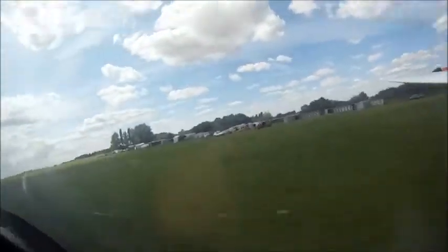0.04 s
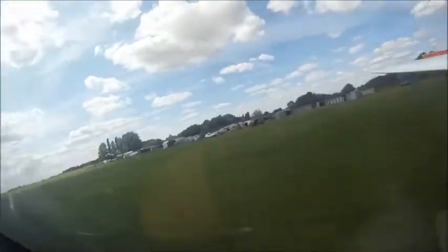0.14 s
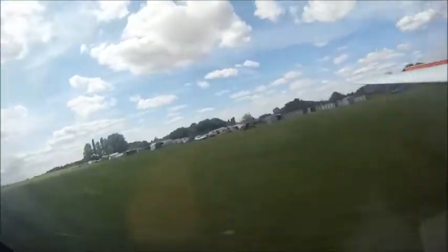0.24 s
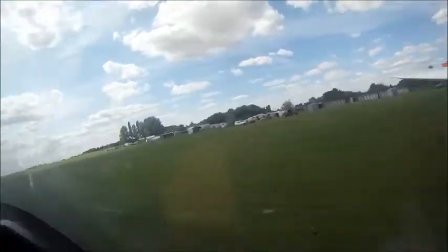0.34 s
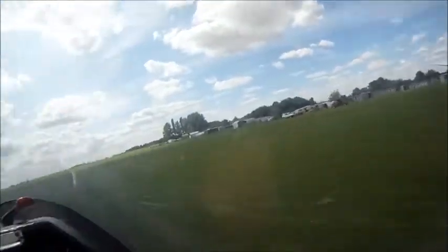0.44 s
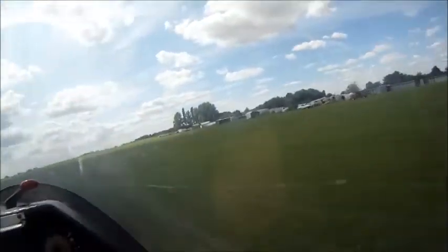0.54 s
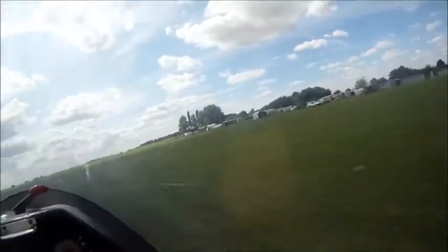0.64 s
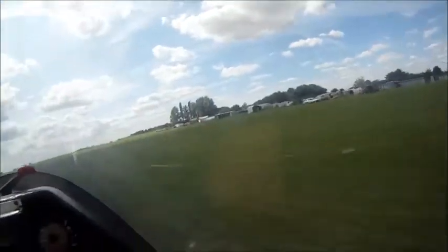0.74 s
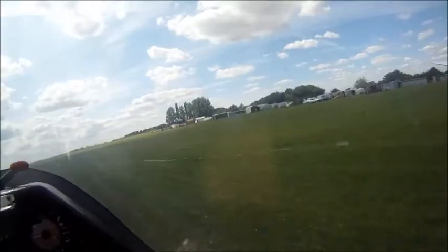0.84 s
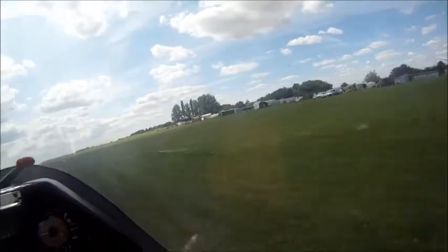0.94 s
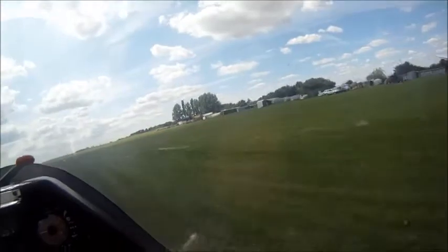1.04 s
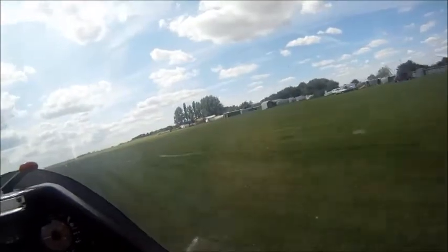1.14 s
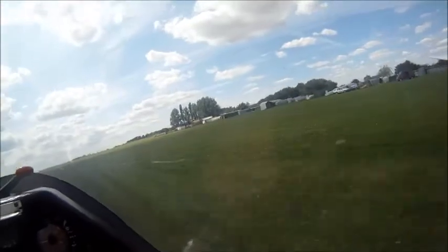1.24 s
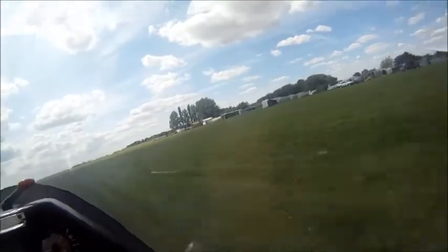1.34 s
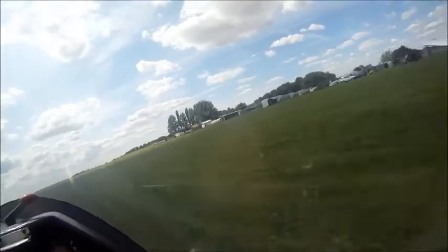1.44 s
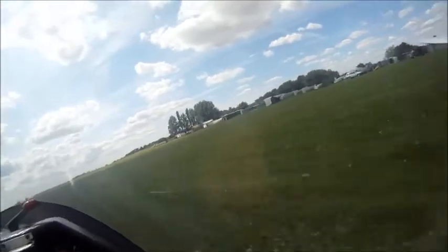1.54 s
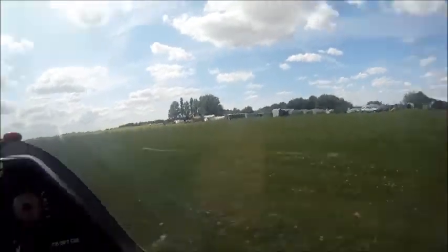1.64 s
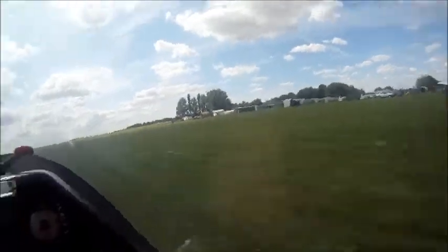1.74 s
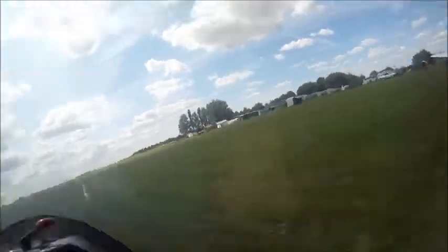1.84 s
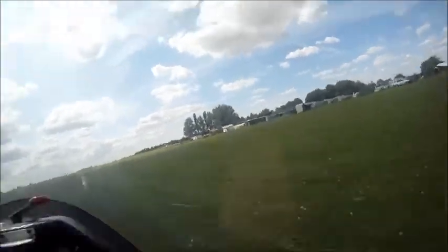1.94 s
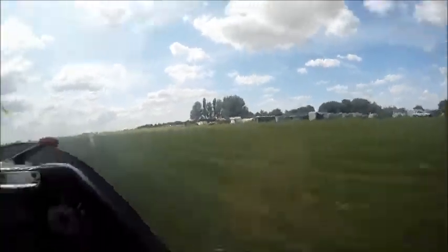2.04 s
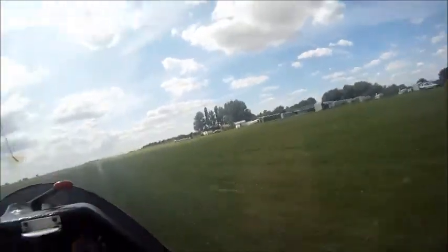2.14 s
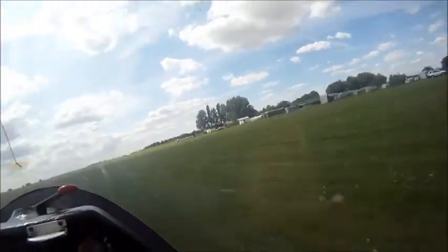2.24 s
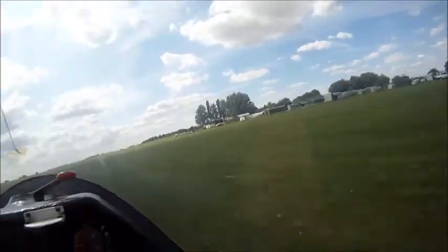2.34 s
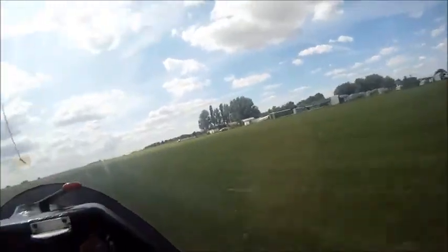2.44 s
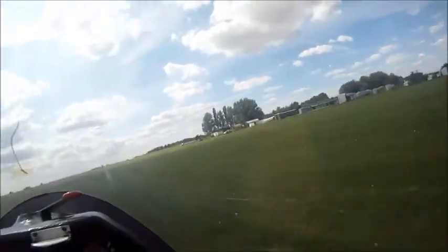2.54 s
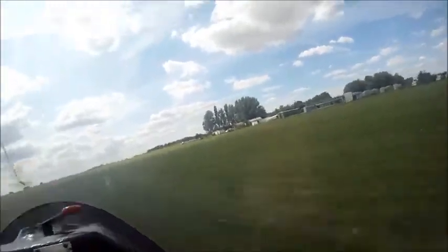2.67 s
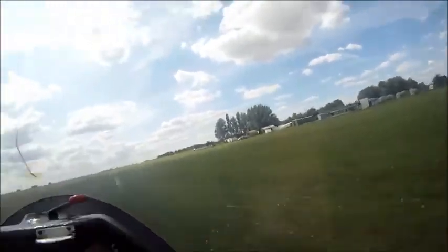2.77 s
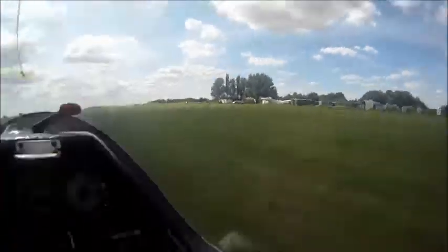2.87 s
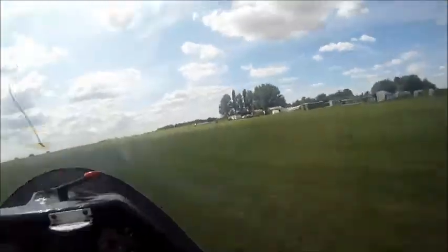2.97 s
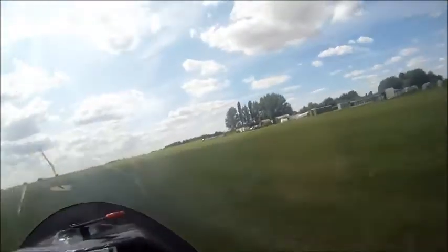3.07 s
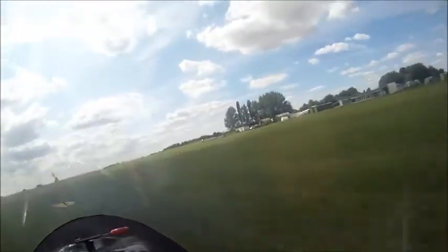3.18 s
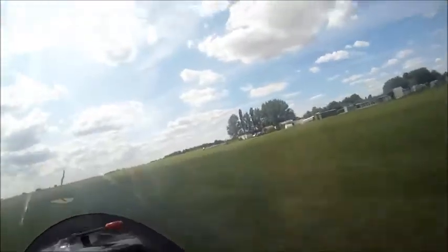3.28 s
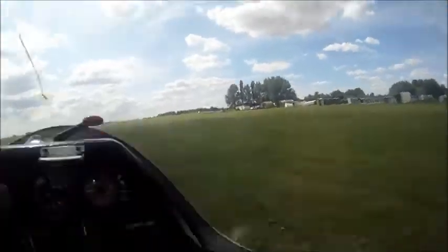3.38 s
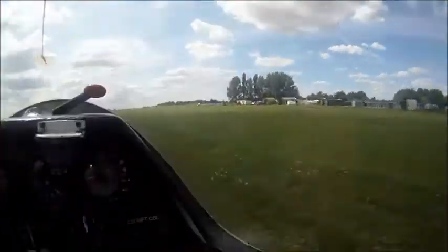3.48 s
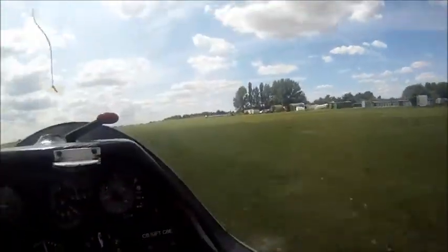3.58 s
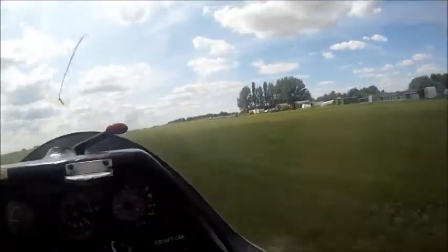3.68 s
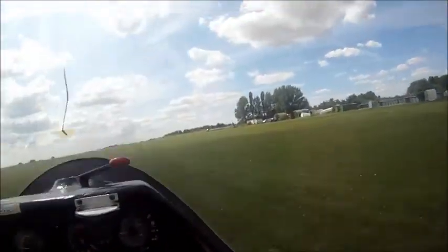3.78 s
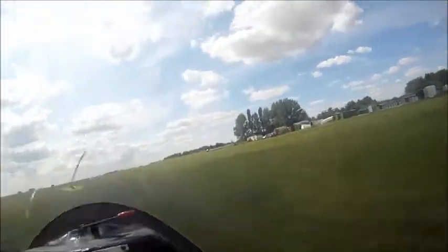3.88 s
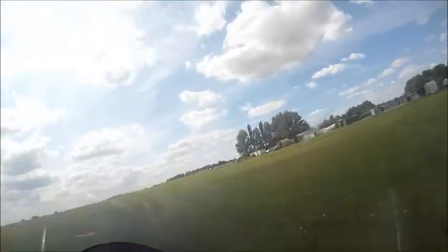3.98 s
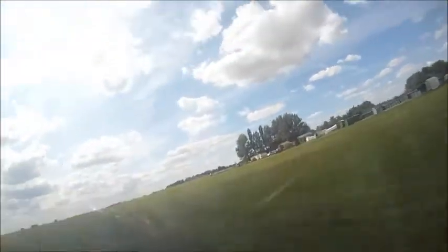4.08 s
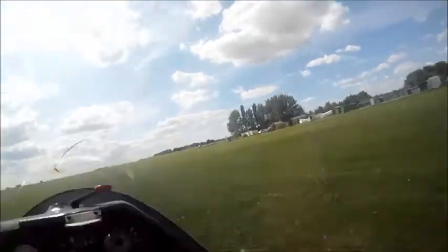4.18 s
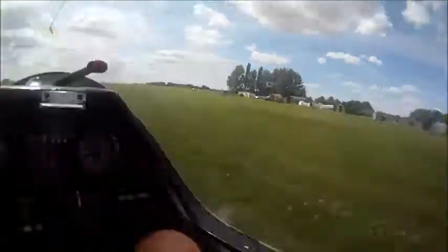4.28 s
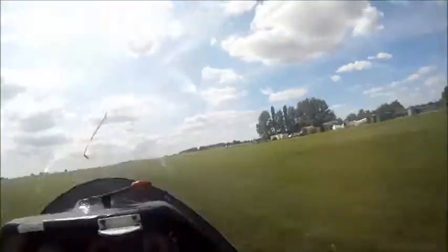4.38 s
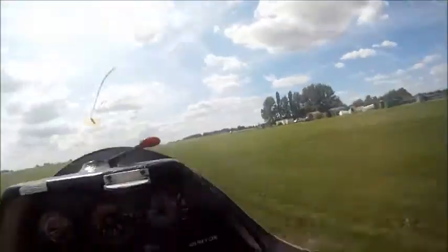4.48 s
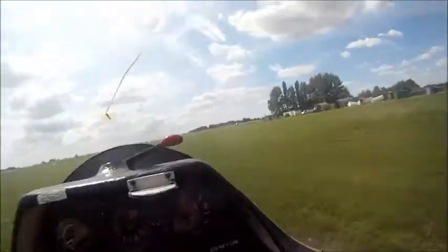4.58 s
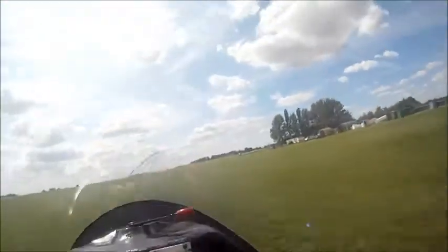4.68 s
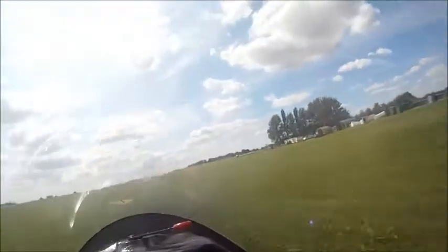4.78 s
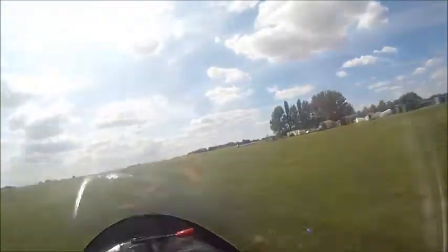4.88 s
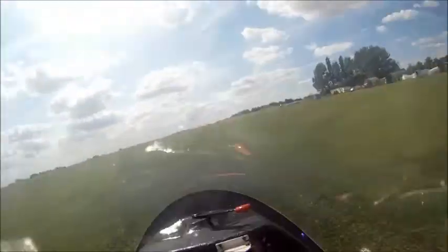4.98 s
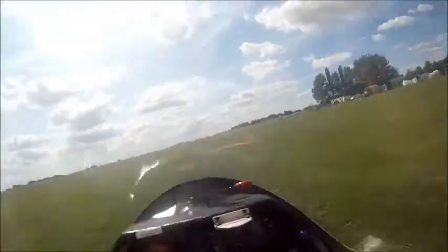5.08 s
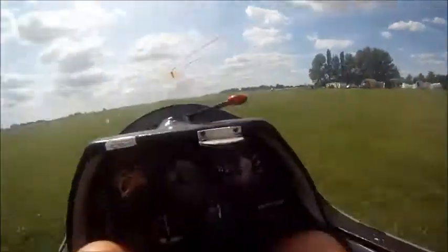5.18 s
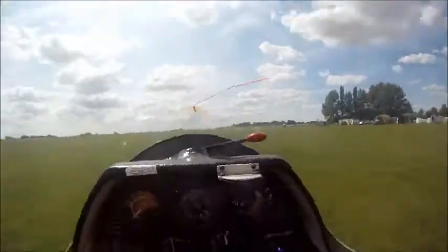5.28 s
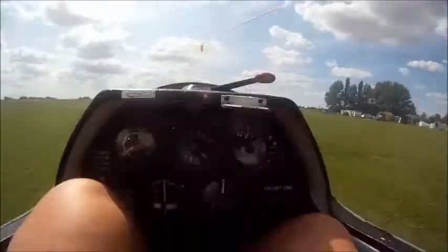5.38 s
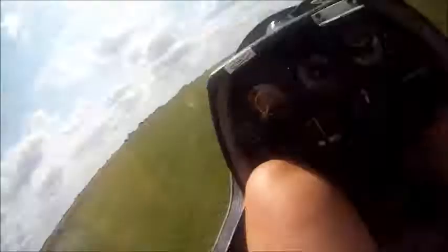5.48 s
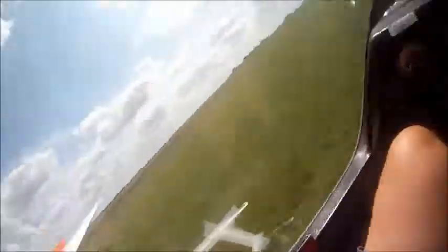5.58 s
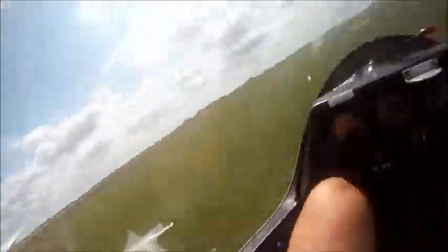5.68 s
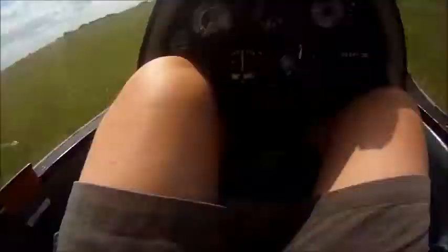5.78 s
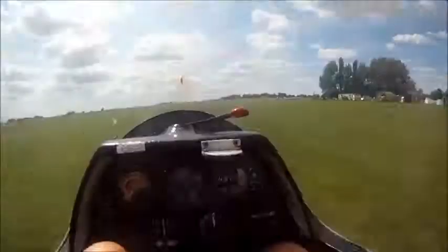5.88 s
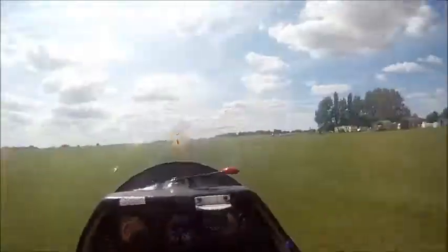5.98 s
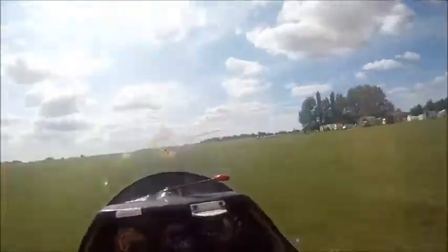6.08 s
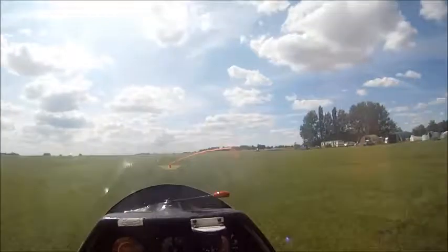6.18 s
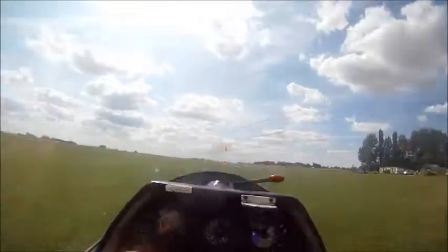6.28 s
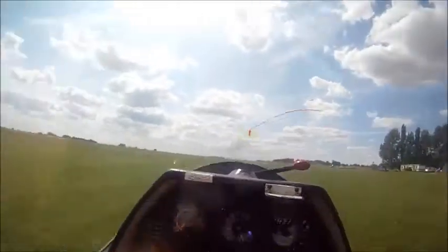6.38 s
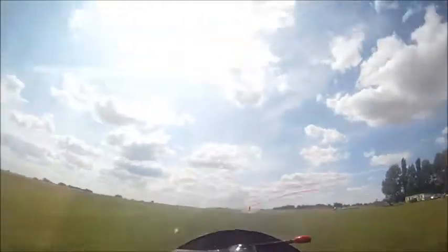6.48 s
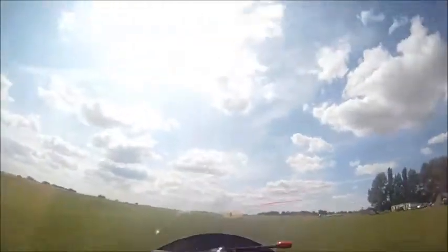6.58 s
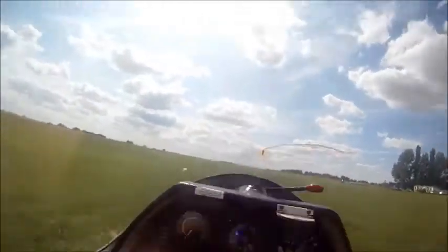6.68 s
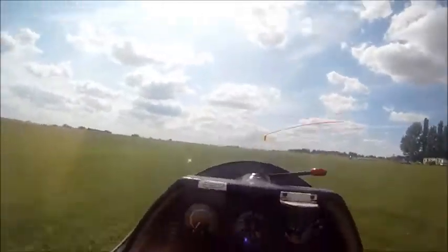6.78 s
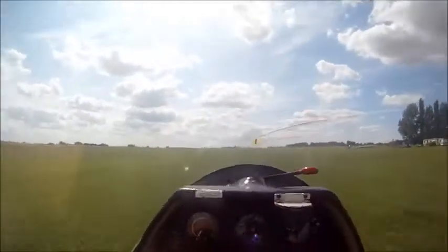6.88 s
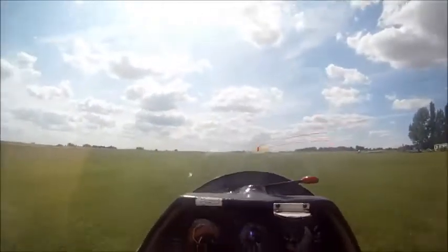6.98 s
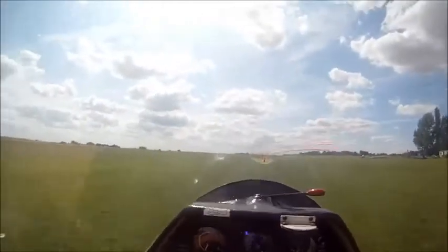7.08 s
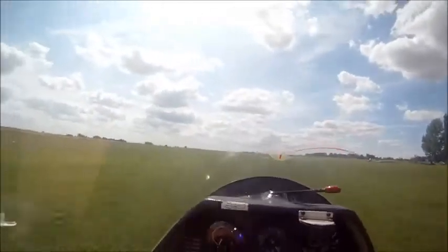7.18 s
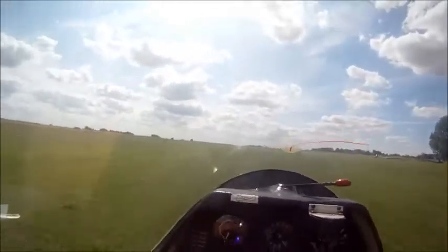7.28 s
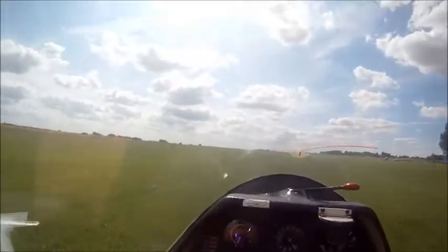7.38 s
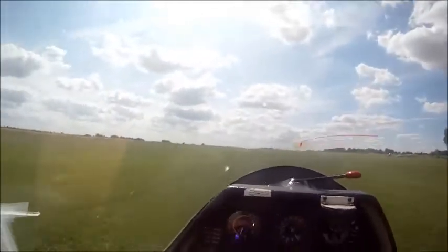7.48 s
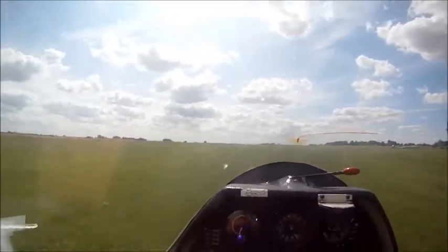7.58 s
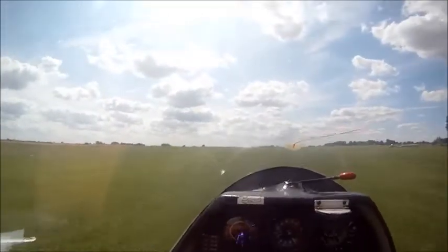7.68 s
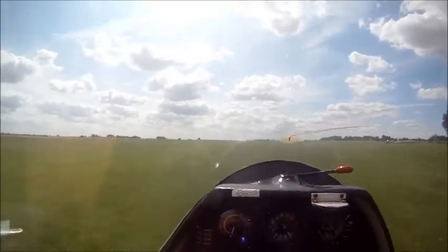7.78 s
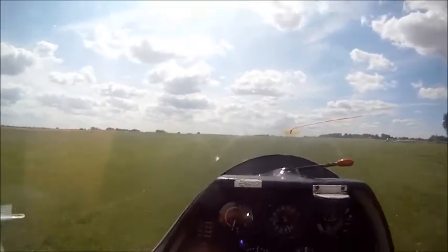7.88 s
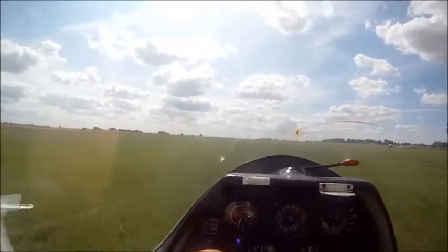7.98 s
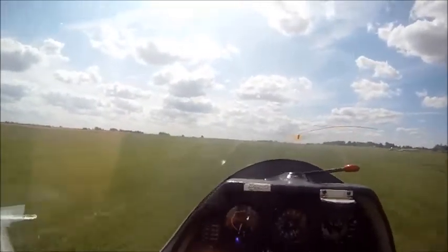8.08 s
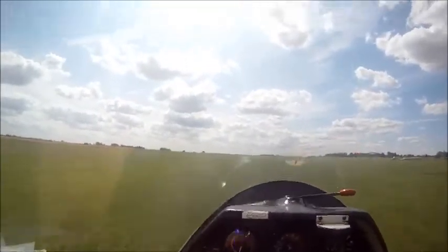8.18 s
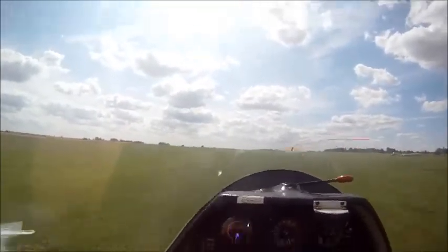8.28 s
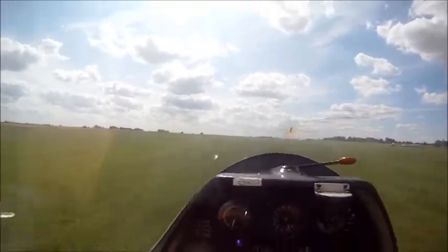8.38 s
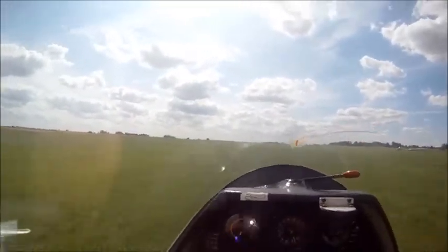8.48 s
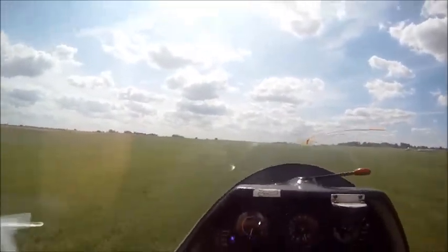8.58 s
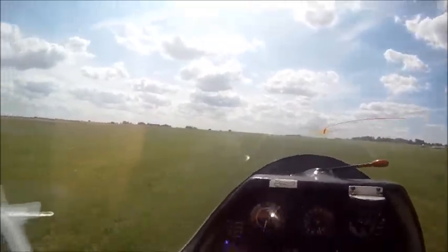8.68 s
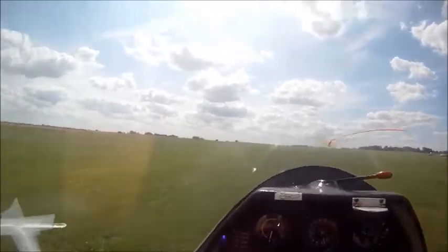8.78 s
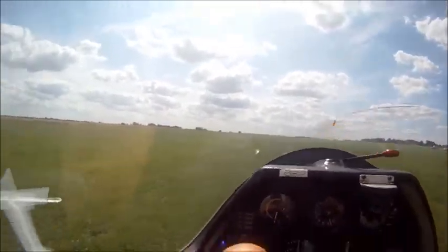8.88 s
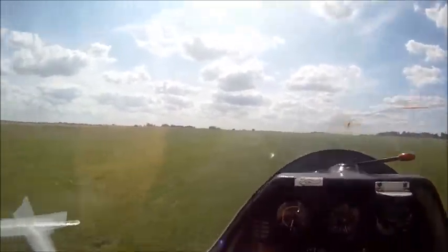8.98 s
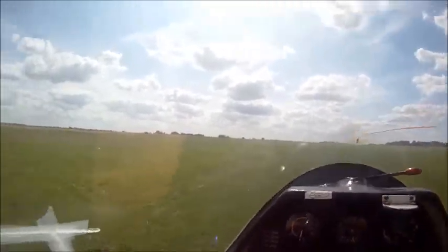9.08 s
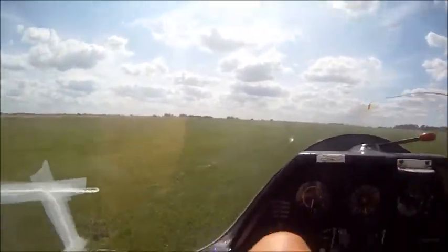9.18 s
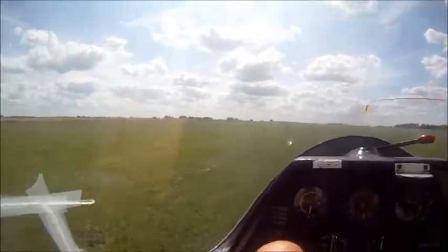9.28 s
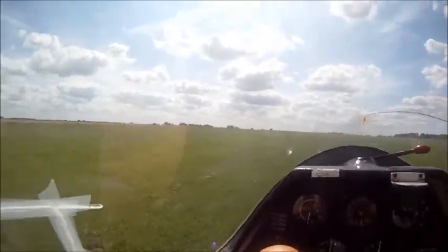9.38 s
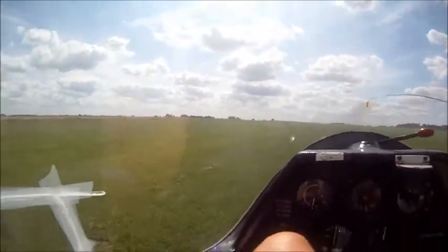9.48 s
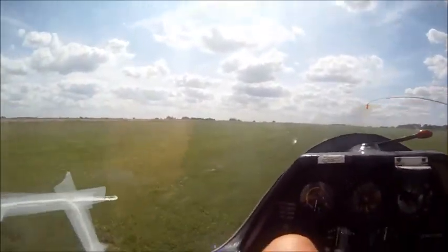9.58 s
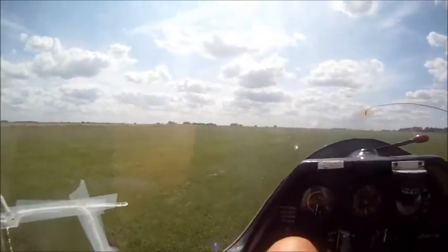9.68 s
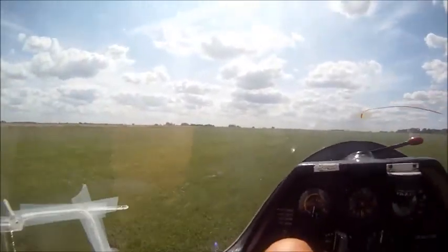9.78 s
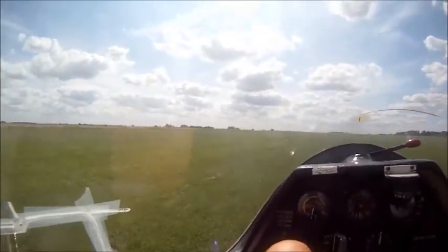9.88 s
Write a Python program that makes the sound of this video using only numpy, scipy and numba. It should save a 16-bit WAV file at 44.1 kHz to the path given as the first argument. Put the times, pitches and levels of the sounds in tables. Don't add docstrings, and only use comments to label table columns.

```python
import sys
import numpy as np
from scipy import signal
from scipy.io import wavfile
from scipy.ndimage import uniform_filter1d
from numba import njit

SR = 44100
rng = np.random.default_rng(int(sys.argv[2]) if len(sys.argv) > 2 else 0)


def boost_factor(decibels):
    exponent = np.asarray(decibels, float) / 20
    return 10 ** exponent


def put_to_file(sound):
    columns = np.atleast_2d(sound).T
    safe = np.clip(columns, -1, 1)
    whole_steps = np.round(safe * 32767)
    wavfile.write(sys.argv[1], SR, whole_steps.astype(np.int16))


N = 437912

# time_s, level_db
AIR_RUSH = [(0, -48), (.7, -49.5), (1.5, -54), (4.9, -52.5), (7.2, -54), (8.8, -64), (9.93, -60)]
# centre_hz, width_hz, level_db
VENT_BANDS = [(363, 30, -7), (465, 100, -7), (698, 370, -4.5), (1040, 83, -7), (1190, 220, -3),
              (2060, 700, -2), (2590, 770, -4.5), (3260, 920, -5), (3840, 520, -10), (5180, 1800, -4.5),
              (4920, 160, -10.5)]

# time_s, wheel_load_db, cockpit_shaking_db
GROUND_RUN = [(0, -41, -66), (1.5, -46, -55), (1.56, -29, -40), (1.98, -26.5, -34), (2.25, -41, -37.5),
              (2.6, -29, -38), (3.2, -27, -39), (3.43, -29.5, -33), (3.75, -31.5, -44.5),
              (4.25, -32.5, -39), (4.92, -32.5, -46.5), (5.08, -35.5, -50.5), (5.4, -30, -38),
              (6.4, -28.5, -36), (7.05, -30.5, -45), (8.3, -38.5, -54), (8.9, -49.5, -56),
              (9.93, -56, -62.5)]
# crest_s, rise_s, heave_db, fork_db
RUT_EVENTS = [(.296, 0.18, -31, -37), (0.803, 0.036, -25, -37), (.976, 0.087, -43, -37),
              (1.8, 0.13, -35, -24), (2.06, 0.21, -24, -19), (2.42, 0.33, -38.5, -28),
              (2.62, 0.3, -26, -45), (2.812, 0.13, -47, -16), (2.87, 0.037, -25.5, -21),
              (3.35, 0.27, -25, -20), (4.24, 0.37, -33.5, -23.5), (4.285, 0.016, -12, -22),
              (4.36, 0.028, -16, -36), (4.95, 0.016, -41, -30), (5.001, 0.044, -18, -19),
              (5.48, 0.022, -19, -19.5), (5.55, 0.026, -10, -27), (5.67, 0.1, -38, -23),
              (5.85, 0.15, -15, -31), (5.97, 0.088, -23, -46), (6.45, 0.064, -19.5, -28),
              (6.76, 0.052, -26, -34), (8.35, 0.061, -39, -38), (9.46, 0.046, -57, -49)]
# centre_hz, width_hz, level_db
HEAVE_BANDS = [(34.3, 28.4, 0), (61, 26, -1), (91, 16, -7.5)]
# centre_hz, width_hz, level_db
FORK_BANDS = [(113, 24, -8.5), (136.4, 30.5, 1), (158, 51, -4), (215, 95, -6.5)]

# centre_hz, width_hz, level_db
PANEL_BANDS = [(215, 61, -0.5), (294, 96, -0.5), (360, 44.6, -2), (463, 83, -2), (599, 130, -0.5),
               (963, 120, -1.5), (1211, 130, 0), (1463, 300, -7.5)]
# centre_hz, width_hz, level_db
CASE_BANDS = [(2108, 610, 0.5), (2600, 730, -9), (3077, 470, -7), (3743, 430, -6.5), (4300, 430, -17.5),
              (5185, 1800, -8)]
# centre_hz, width_hz, level_db
TRIM_BANDS = [(3270, 430, 3.5), (5140, 730, -1.5)]
# start_s, length_s, rattle_db, drum_db
STRAP_SCRAPES = [(.238, 0.021, -27, -33), (.29, 0.048, -39, -33.5), (.351, 0.03, -32.5, -47),
                 (1.6, 0.051, -32.5, -37.5), (1.876, 0.055, -21, -26), (2.404, 0.076, -34, -38),
                 (2.584, 0.096, -29, -33), (2.763, 0.058, -28, -25), (3.316, 0.1, -30.5, -32.5),
                 (4.128, 0.076, -32, -32), (4.342, 0.023, -26, -42), (4.362, 0.022, -23, -26),
                 (4.435, 0.036, -26, -29), (4.66, 0.032, -33.5, -31.5), (5.243, 0.067, -36.5, -33),
                 (5.3, 0.084, -28.5, -31.5), (5.511, 0.06, -18, -19.5), (5.672, 0.045, -22, -25),
                 (5.545, 0.017, -13, -18), (5.745, 0.12, -31, -30), (5.813, 0.025, -17, -19.5),
                 (6.057, 0.057, -28, -38.5), (6.218, 0.14, -25, -35), (6.28, 0.099, -18, -37),
                 (6.452, 0.075, -21.5, -28.5), (6.526, 0.032, -14.5, -28), (6.565, 0.042, -25, -33),
                 (6.66, 0.048, -31, -33.5), (6.722, 0.08, -28.5, -38), (6.927, 0.062, -32.5, -35),
                 (7.754, 0.074, -44, -46), (7.959, 0.039, -37, -50), (8.222, 0.025, -32, -40),
                 (8.02, 0.025, -45, -52), (8.18, 0.045, -51, -47), (8.25, 0.038, -46, -47),
                 (8.33, .03, -51, -49), (8.405, 0.027, -49, -54), (8.49, 0.039, -51, -45.5),
                 (9.5, .08, -56, -55), (9.752, 0.038, -46.5, -40.5)]
# start_s, rattle_db
TUSSOCK_HITS = [(1.66, -32), (1.76, -40), (2.273, -39), (2.326, -25.5), (2.523, -33), (2.705, -32),
                (2.997, -53), (3.035, -29), (3.268, -27), (3.548, -28), (3.656, -31), (3.739, -31.5),
                (3.837, -29), (3.941, -31.5), (4.034, -30), (4.201, -31), (4.256, -27.5), (4.475, -37),
                (4.555, -29.5), (4.632, -42), (4.695, -34), (4.739, -29), (4.783, -30.5), (4.827, -33),
                (4.9, -40), (5.027, -32.5), (5.182, -32.5), (5.409, -27.5), (5.443, -25), (5.894, -30.5),
                (5.944, -33), (6.01, -42), (6.394, -27), (6.641, -32.5), (7.051, -39), (7.081, -33)]
# start_s, rattle_db
STUBBLE_HITS = [(7.241, -38.5), (7.286, -49), (7.37, -36.5), (7.453, -40), (7.558, -45), (7.729, -48),
                (7.789, -42), (7.864, -47), (7.893, -40), (8.06, -43), (8.126, -39.5), (8.29, -35),
                (8.479, -47), (8.613, -41), (8.728, -48), (8.762, -42), (8.797, -37.5), (8.842, -53),
                (8.898, -54), (8.929, -49.5), (9.041, -58.5), (9.268, -57.5), (9.545, -54), (9.612, -56),
                (9.466, -53), (9.883, -44.5)]

# start_s, length_s, level_db, pitch_hz
STRAP_CREAKS = [(0.297, 0.024, -32, 1060), (0.327, 0.014, -34, 2200), (0.349, 0.007, -37, 4020),
                (1.88, 0.027, -28, 2270), (2.269, 0.044, -44, 3600), (2.45, .04, -43, 3670),
                (2.59, 0.058, -40.5, 3650), (3.035, 0.014, -37.5, 3750), (3.842, .03, -47, 3350),
                (4.138, .02, -36, 2080), (4.241, 0.05, -37.5, 2150), (4.362, 0.02, -24, 2200),
                (4.438, 0.015, -30.5, 990), (4.437, 0.011, -34.5, 3470), (4.78, .012, -38, 1200),
                (5.33, 0.047, -31, 2150), (5.343, 0.037, -34, 3500), (5.531, 0.027, -29, 3320),
                (5.758, 0.057, -31.5, 2080), (5.795, 0.036, -32, 3280), (5.889, 0.019, -27, 2000),
                (6.054, 0.049, -28.5, 2060), (6.083, 0.017, -37, 3670), (6.154, 0.028, -43, 1200),
                (6.263, 0.045, -31, 1210), (6.3, 0.052, -24, 2220), (6.34, 0.033, -32, 1000),
                (6.492, 0.032, -26, 2230), (6.533, 0.02, -21.5, 2300), (6.922, 0.053, -34, 2100),
                (7.96, .025, -52, 2470), (8.008, 0.027, -56, 3300), (8.052, .02, -50, 1180),
                (8.102, 0.037, -55, 1190), (8.124, .025, -53, 3250), (8.175, 0.067, -48, 450),
                (8.222, 0.015, -45, 1190), (8.285, 0.036, -48, 1174), (8.483, 0.033, -54, 2970),
                (8.525, 0.21, -52.5, 447), (8.612, 0.012, -51, 5200), (8.618, 0.041, -55.5, 3180),
                (9.455, 0.037, -54, 396), (9.751, 0.029, -40, 1150), (9.754, 0.021, -42, 3020),
                (9.756, 0.037, -45, 2170), (9.883, 0.022, -56, 1200)]

# start_s, shell_db, pitch_hz, knock_db
MOUNT_TAPS = [(0.269, -47, 2080, -30), (1.7625, -38, 3700, -33), (2.0675, -42, 2100, -22),
              (2.1489, -24.5, 2200, -45), (2.3286, -36, 2350, -39), (3.5472, -30, 2370, -51),
              (3.8378, -31, 2380, -38), (4.1503, -30, 2180, -42), (4.271, -28, 2100, -25),
              (4.288, -32, 1700, -26), (4.2775, -10.5, 2250, -38), (4.982, -22, 2200, -31.5),
              (5.3004, -26.5, 2140, -41), (5.3515, -20, 2080, -37), (5.5316, -22, 3600, -38),
              (5.549, -16, 3250, -22), (5.654, -36, 1900, -26), (5.6767, -40, 2060, -37),
              (5.8127, -23, 3250, -32), (5.8813, -36, 1900, -35), (5.902, -33, 2500, -22),
              (5.918, -40, 1500, -25), (6.017, -32, 2080, -34), (6.0743, -20.5, 2140, -30),
              (6.223, -22, 2000, -36), (6.284, -20.5, 2180, -35), (6.3526, -23, 2280, -40),
              (6.497, -16, 2320, -36), (6.5192, -16, 2390, -29), (6.531, -17.5, 3080, -28),
              (6.5835, -24, 1970, -32), (6.7526, -17, 2380, -23), (6.9612, -36, 1900, -28),
              (8.3313, -42, 2000, -57), (8.6904, -50, 2100, -57), (9.4676, -51, 2400, -54),
              (9.6697, -49, 2150, -62), (9.6986, -51, 2300, -62), (.949, -55, 1500, -42),
              (2.0345, -13.5, 1530, -32), (0.972, -28, 1580, -40), (2.8618, -2, 3500, -19.5),
              (4.2772, -9.5, 3390, -40), (2.9612, -15, 2550, -40)]
# start_s, shell_db, pitch_hz, crack_db
SHELL_TICKS = [(.256, -8, 2190, -18), (0.7003, -16.5, 2170, -38), (.847, -19.5, 2100, -41),
               (2.061, -6.5, 2300, -18.5), (2.8617, 3.5, 2240, -9), (3.3599, -7, 2190, -24),
               (4.5293, -8.5, 2265, -28.5), (4.985, -3, 1930, -9.5), (5.1898, -11.5, 2170, -30),
               (5.4158, -15, 2200, -26), (5.465, -5, 2220, -26), (5.4795, 11.5, 2190, 9),
               (5.8242, -8.5, 2250, -27), (5.8382, -5, 2370, -17.5), (6.2379, 5.5, 2310, -13),
               (6.2952, -6, 2230, -18), (6.317, -14, 2240, -34), (6.48, 2, 2260, -11),
               (6.5364, -7, 2290, -35), (6.543, -11, 2240, -15), (6.6526, -18, 2100, -29),
               (6.7208, -12.5, 2250, -31), (6.771, -18, 1970, -35), (6.815, -0.5, 2225, -8),
               (6.8807, 2, 2216, -9), (6.9805, -4, 2215, -19.5), (8.8637, -25, 2060, -43),
               (9.185, -13, 2210, -32.5), (9.416, -47.5, 1970, -46.5), (9.433, -34.5, 2110, -56)]
# start_s, knock_db, shell_db, crack_db
HOLLOW_KNOCKS = [(0.0841, -33.5, -51, -64), (0.138, -41, -44, -52), (0.2763, -8, -26, -49),
                 (0.3515, -39, -28, -35.5), (0.432, -35, -43, -48), (0.7943, -18, -45, -59),
                 (.826, -24, -28, -48), (0.9706, -18, -29, -56), (1.8626, -11.5, -13.5, -20.5),
                 (2.034, -16, -6, -27), (2.7666, -27.5, -39, -34), (2.8806, -22, -18, -25),
                 (2.8944, -14.5, -26, -47), (2.9612, -8.5, -8, -16), (3.466, -15.5, -33, -38),
                 (4.2777, -15, -28, -16.5), (4.358, -7, -5.5, -16.5), (4.365, -16.5, -20, -44),
                 (4.426, -23, -42, -48), (5.2587, -25, -43, -55), (5.321, -23.5, -22, -29.5),
                 (5.371, -26.5, -25, -25), (5.4345, -25.5, -24.5, -40), (5.4515, -19.5, -15.5, -33.5),
                 (5.4748, -25.5, -8, -23), (5.862, -19, -25, -47), (6.2, -23, -17.5, -35),
                 (6.7445, -15.5, -13, -39), (7.012, -21, -25, -47)]
# start_s, shell_db, pitch_hz, knock_db, crack_db
SLAM_BLOWS = [
    (4.9638, 8.002, 2527, 2, 4.5),
    (4.9694, 8, 2157, -7, -9.5),
]
# start_s, level_db
BUCKLE_TICKS = [(7.6546, -38), (9.661, -48.5), (9.7174, -42.5)]
# pitch_hz, level_db, t60_s
HOLLOW_MODES = [(643, -8, 0.022), (990, 4.5, 0.016), (1170, 1, 0.026), (1490, -6, .012)]
# pitch_hz, level_db, t60_s
SHARP_MODES = [(2690, -4, 0.0053), (3128, 4.5, 0.0093), (3608, 3, 0.0077), (4130, -3, 0.0035),
               (5007, -1, 0.008)]

# start_s, push_db, contact_ms, direction, swing_db
MOUNT_JABS = [(.085, -18, 3.2, -1, -23), (.2759, -7, 1.2, -1, -15.5), (0.3538, -21, 7.3, -1, -30),
              (0.357, -15, 11.4, 1, -21), (.433, -28, 2.2, -1, -25), (0.7943, -16.5, 2, -1, -16.5),
              (0.827, -14, 0.6, -1, -21), (0.9706, -6, 0.76, -1, -24), (1.689, -9.5, 2.34, 1, -12),
              (1.865, -5.5, 1.26, 1, -14), (2.034, -15, 2.1, -1, -26), (2.88, -1.5, 1.2, 1, -9.5),
              (2.9602, -4.5, 1.5, 1, -13), (3.466, -10.5, 0.86, -1, -19), (4.2754, -0.5, 1.6, 1, -7),
              (4.3544, -6.5, 2.8, 1, -17), (5.433, -8.5, 0.84, -1, -15), (5.465, 0.5, 2.33, 1, -19.5),
              (5.478, 0.5, 1.8, 1, -12.5), (5.551, -6, 2.26, 1, -7), (5.6545, -22, 1.7, 1, -32),
              (5.661, -14.5, 3.3, 1, -28), (5.667, -11, 2.5, 1, -26), (5.827, -6.5, 6.5, 1, -14),
              (5.836, -11, 2.9, -1, -10), (6.446, -13, 13.5, 1, -30), (6.459, -11.5, 9, -1, -23.5),
              (6.584, -16.5, 12, -1, -34), (6.7438, -9.5, 4.1, -1, -10.5), (6.7522, -10, 1.7, 1, -21.5),
              (7.0113, -16, 1.8, 1, -28)]
# pitch_hz, level_db, t60_s
MOUNT_MODES = [(54.2, 6.5, 0.082), (130, -14, 0.04)]
# start_s, level_db
HULL_SLAM = (4.9636, 9.7)
# pitch_hz, level_db, t60_s
HULL_MODES = [(168, 4, 0.059), (365, -10.5, 0.064)]


def level(x):
    return x / np.sqrt(np.mean(x ** 2))


def curves(table):
    time_s, *columns_db = np.transpose(table)
    return [boost_factor(np.interp(np.arange(N) / SR, time_s, c)) for c in columns_db]


def walk(rate_hz):
    hold = int(SR / rate_hz)
    steps = np.repeat(rng.standard_normal(N // hold + 1), hold)
    return 1.15 * uniform_filter1d(uniform_filter1d(steps, hold), hold)[:N]


def body(x, bands, order=1, patchy_db=0., rate_hz=25):
    out = 0
    for k, (hz, width_hz, db) in enumerate(bands):
        y = x
        for _ in range(order):
            y = signal.lfilter(*signal.iirpeak(hz, hz / width_hz, SR), y)
        gain = (-1) ** k * boost_factor(db + patchy_db * walk(rate_hz))
        out = out + gain * y * np.sqrt(order * SR / (np.pi * width_hz))
    return out / np.sqrt(sum(boost_factor(2 * band[2]) for band in bands))


def jolts(rate_hz, spread_db, bed):
    hit = rng.random(N) < rate_hz / SR
    size = boost_factor(spread_db * np.minimum(rng.exponential(size=N), 4))
    size = size * rng.choice([-1, 1], N)
    return level(hit * size) + bed * rng.standard_normal(N)


def ring(modes, push_s, t, detune):
    y = 0
    for (hz, db, t60_s), d in zip(modes, detune):
        y = y + boost_factor(db) * np.sin(2 * np.pi * hz * d * t) * np.exp(-np.log(1000) * t / t60_s)
    y = y * np.minimum(t / push_s, 1)
    return y / np.abs(y).max()


def air():
    noise = rng.standard_normal(N)
    return curves(AIR_RUSH)[0] * body(noise, VENT_BANDS, order=2, patchy_db=0.7, rate_hz=11)


def ruts():
    depth_db, fall_share = 15.5, 0.62
    t = np.arange(N) / SR
    out = np.zeros((2, N))
    for crest_s, rise_s, *db in RUT_EVENTS:
        i = max(int((crest_s - 2 * rise_s) * SR), 0)
        j = int((crest_s + 2 * rise_s) * SR)
        past_s = t[i:j] - crest_s
        down_db = depth_db * np.maximum(-past_s, past_s / fall_share) / rise_s
        out[:, i:j] += boost_factor(np.array(db)[:, None] - down_db) ** 2
    return out


def hull():
    fork_db, fork_slope = -37.5, 1.12
    load = curves(GROUND_RUN)[0]
    steady = np.array([load, boost_factor(fork_db) * (load / boost_factor(-32)) ** fork_slope])
    heave, fork = np.sqrt(steady ** 2 + ruts())
    low = body(jolts(rate_hz=48, spread_db=1.5, bed=0.96), HEAVE_BANDS, patchy_db=1.5, rate_hz=12)
    mid = body(jolts(rate_hz=83, spread_db=2.5, bed=0.63), FORK_BANDS, order=2, patchy_db=3.0, rate_hz=18)
    tyre = signal.butter(3, 330, fs=SR, output="sos")
    return signal.sosfilt(tyre, heave * low + 0.87 * fork * mid)


def bumps():
    tufts = [(s, 0.026, db, db - 0.5) for s, db in TUSSOCK_HITS]
    stubble = [(s, 0.017, db, db - 8.5) for s, db in STUBBLE_HITS]
    return STRAP_SCRAPES + tufts + stubble


def scuffs():
    out = np.zeros((2, N + SR))
    for start_s, length_s, rattle_db, drum_db in bumps():
        t = np.arange(int((length_s + .06) * SR)) / SR
        swell = np.minimum(t / (0.00093 + 0.033 * length_s), 1)
        fade = np.exp(-.95 * t / length_s - np.maximum(t - 0.9 * length_s, 0) / 0.0079)
        gain = boost_factor(np.array([[drum_db + 2.0], [rattle_db + 2.0]]))
        i = int((start_s - 0.041 * length_s) * SR)
        out[:, i:i + len(t)] += (gain * swell * fade) ** 2
    return np.sqrt(out[:, :N])


def cockpit():
    hiss_db, hiss_slope = -43, 1.34
    drum = curves(GROUND_RUN)[1]
    hiss = boost_factor(hiss_db) * (drum / boost_factor(-40.5)) ** hiss_slope
    bump_drum, bump_rattle = scuffs()
    flutter = walk(55)

    panels = drum * jolts(rate_hz=900, spread_db=1.5, bed=1.7) * boost_factor(1.8 * flutter)
    panel_grain = jolts(rate_hz=900, spread_db=3.0, bed=0.64) * boost_factor(3.2 * walk(120))
    panels = panels + 1.24 * bump_drum * panel_grain

    case = hiss * jolts(rate_hz=1500, spread_db=2.5, bed=0.7) * boost_factor(2.2 * flutter)
    case_grain = jolts(rate_hz=1500, spread_db=2.5, bed=0.46) * boost_factor(2.0 * walk(200))
    case = case + 0.78 * bump_rattle * case_grain

    trim = boost_factor(-31.5) * bump_rattle ** 0.62 * jolts(rate_hz=2500, spread_db=3.0, bed=0.6)
    out = body(trim, TRIM_BANDS, order=2, patchy_db=1.0, rate_hz=22)
    out = out + 0.6 * body(panels, PANEL_BANDS, patchy_db=2.5, rate_hz=35)
    return out + 0.39 * body(case, CASE_BANDS, order=2, patchy_db=2.5, rate_hz=37)


def creaks():
    sharpness_q, blur_hz = 8.7, 220
    out = np.zeros(N + SR)
    grains = jolts(rate_hz=1100, spread_db=2.0, bed=0.32) * boost_factor(2.0 * walk(150))
    for start_s, length_s, db, hz in STRAP_CREAKS:
        i = int(start_s * SR)
        t = np.arange(int((length_s + .03) * SR)) / SR
        t = t[:N - i]
        swell = np.minimum(t / (.12 * length_s), 1)
        fade = np.exp(-.8 * t / length_s - np.maximum(t - length_s, 0) / 0.0042)
        width_hz = hz / sharpness_q + blur_hz
        b, a = signal.iirpeak(hz, hz / width_hz, SR)
        y = swell * fade * grains[i:i + len(t)]
        y = signal.lfilter(b, a, signal.lfilter(b, a, y))
        out[i:i + len(t)] += boost_factor(db + 2.0) * y * np.sqrt(2 * SR / (np.pi * width_hz))
    return out[:N]


def taps():
    return [(s, shell_db, hz, knock_db, shell_db - 17) for s, shell_db, hz, knock_db in MOUNT_TAPS]


def blows():
    hollow_hz = 2060
    ticks = [(s, shell_db, hz, crack_db - 15, crack_db) for s, shell_db, hz, crack_db in SHELL_TICKS]
    hollow = [(s, shell_db, hollow_hz, knock_db, crack_db)
              for s, knock_db, shell_db, crack_db in HOLLOW_KNOCKS]
    buckle = [(s, db, hollow_hz, db - 5, db - 16) for s, db in BUCKLE_TICKS]
    return sorted(ticks + hollow) + SLAM_BLOWS + buckle


def knocks(hits):
    out = np.zeros(N + SR)
    t = np.arange(SR // 20) / SR
    chance = rng.standard_normal((len(hits), 9))
    dust = level(body(rng.standard_normal(N), [(2100, 2200, 0)], order=2))
    for (start_s, shell_db, hz, knock_db, crack_db), c in zip(hits, chance):
        i = int(start_s * SR)
        contact_s = 0.0033 * (1 + 0.085 * c[8])
        touch = np.abs(np.sin(np.pi * (t / contact_s) ** 0.84)) ** 0.83
        shape = np.where(t < contact_s, touch, 0) + 0.019 * np.exp(-t / 0.0034)
        shell = boost_factor(shell_db) * shape * np.sin(2 * np.pi * hz * t)
        knock = boost_factor(knock_db + 7.5) * ring(HOLLOW_MODES, 0.00035, t, 1 + 0.06 * c[:4])
        crack = boost_factor(crack_db + 8.5) * ring(SHARP_MODES, 0.00057, t, 1 + 0.015 * c[3:8])
        grit_gain = boost_factor(knock_db - 7.5) + boost_factor(crack_db - 2.0)
        grit = grit_gain * np.minimum(t / 0.00026, 1) * np.exp(-t / 0.002) * dust[i:][:len(t)]
        out[i:i + len(t)] += shell - knock + crack + grit
    return out[:N]


def jabs():
    out = np.zeros(N + SR)
    t = np.arange(SR // 6) / SR
    chance = rng.standard_normal((len(MOUNT_JABS), 2))
    for (start_s, push_db, contact_ms, way, swing_db), c in zip(MOUNT_JABS, chance):
        push = np.sin(np.pi * np.minimum(t / (contact_ms / 1000), 1))
        swing = ring(MOUNT_MODES, .002, t, 1 + 0.3 * c)
        i = int(start_s * SR)
        out[i:i + len(t)] += np.sign(way) * (boost_factor(push_db) * push - boost_factor(swing_db) * swing)
    slam_s, slam_db = HULL_SLAM
    i = int(slam_s * SR)
    out[i:i + len(t)] -= boost_factor(slam_db) * ring(HULL_MODES, 0.00017, t, [1, 1])
    return out[:N]


def scene():
    mono = air() + hull() + cockpit() + creaks() + knocks(taps()) + knocks(blows()) + jabs()
    return np.array([mono, mono])


@njit
def duck(x, top, attack, release, lag, depth):
    y, seen_level = np.empty(len(x)), 0.
    for i in range(len(x)):
        y[i] = x[i] * (top / max(seen_level, top)) ** depth
        seen = abs(x[max(i - lag, 0)])
        seen_level += (seen - seen_level) * (attack if seen > seen_level else release)
    return y


def sample_and_hold(x):
    camera_hz, top_hz = 12000, 15400
    x = signal.sosfilt(signal.butter(5, 5700, fs=SR, output="sos"), x)
    slow = signal.resample_poly(x, camera_hz // 300, SR // 300)
    held = signal.resample_poly(np.repeat(slow, 4), SR // 300, 4 * camera_hz // 300)[:N]
    held = signal.sosfiltfilt(signal.ellip(6, .1, 35, top_hz, fs=SR, output="sos"), held)
    return np.clip(np.pad(held, (0, N - len(held))), -1, 1)


def roll_off(x):
    return signal.sosfilt(signal.butter(12, 16360, fs=SR, output="sos"), x)


def record(dry):
    ducked = duck(dry[0], 0.26, 0.0059, 0.00037, int(0.0084 * SR), 1.0)
    held = sample_and_hold(np.clip(ducked, -1, 1))
    apart = boost_factor(-45.0) * walk(1500)
    return roll_off(held * np.array([1 + apart, 1 - apart]))


dry = scene()
out = record(dry)
put_to_file(out)
```